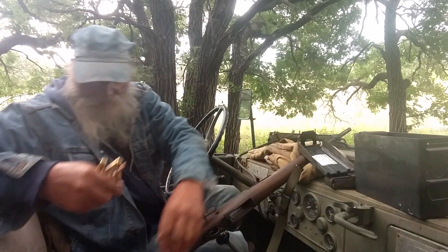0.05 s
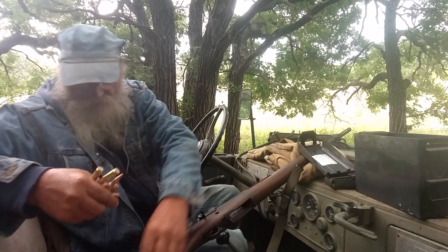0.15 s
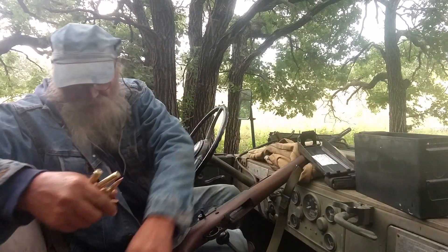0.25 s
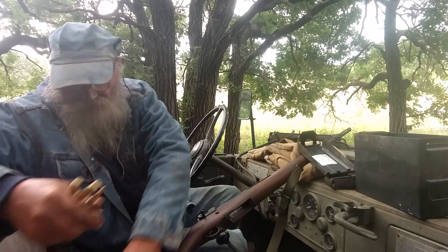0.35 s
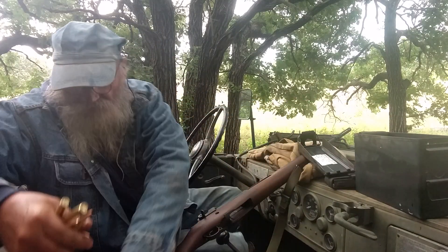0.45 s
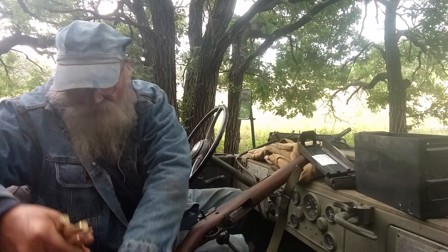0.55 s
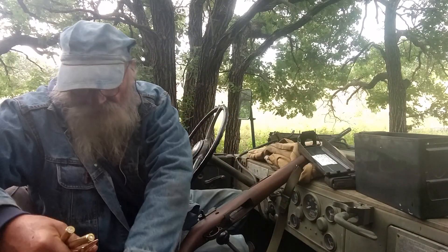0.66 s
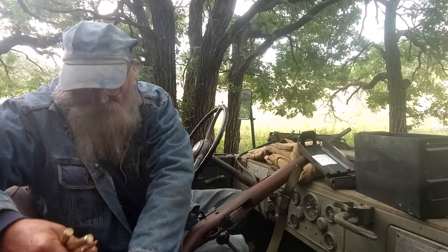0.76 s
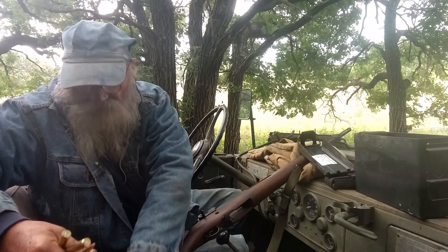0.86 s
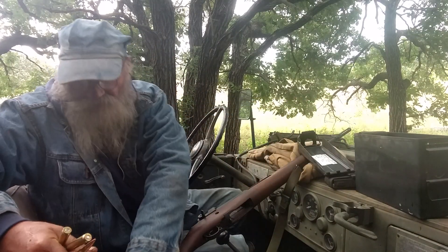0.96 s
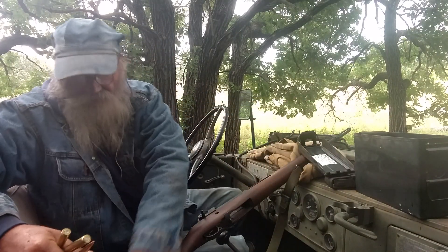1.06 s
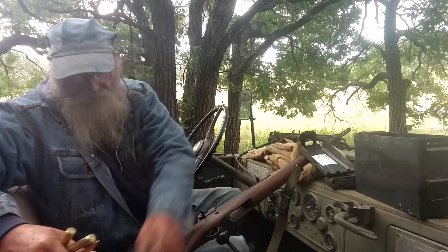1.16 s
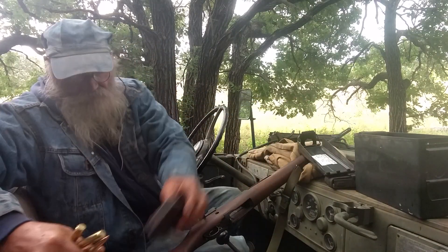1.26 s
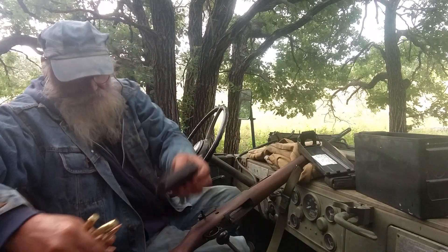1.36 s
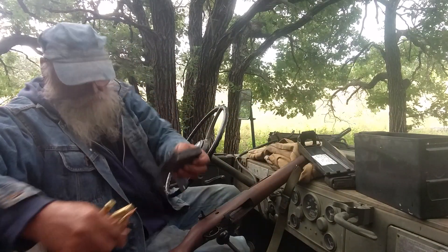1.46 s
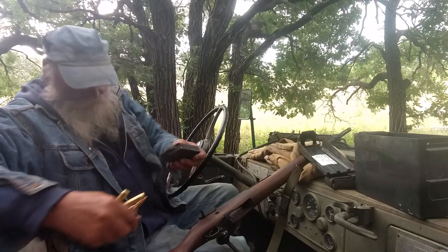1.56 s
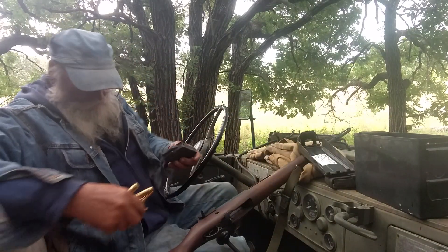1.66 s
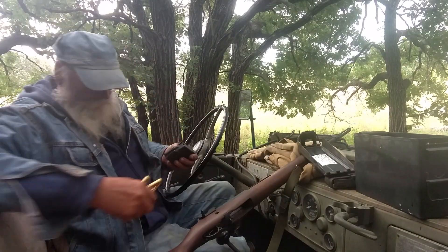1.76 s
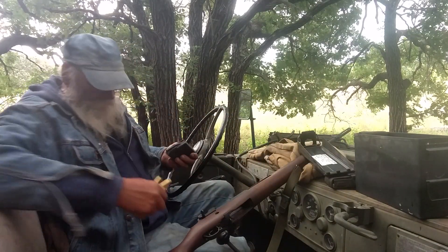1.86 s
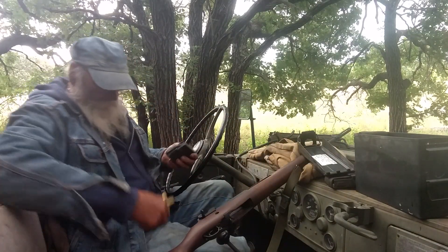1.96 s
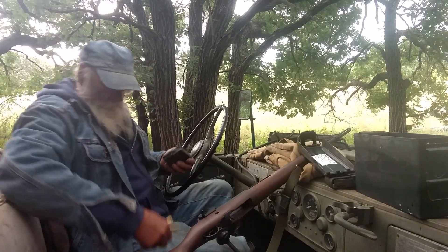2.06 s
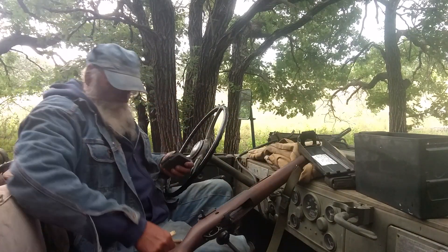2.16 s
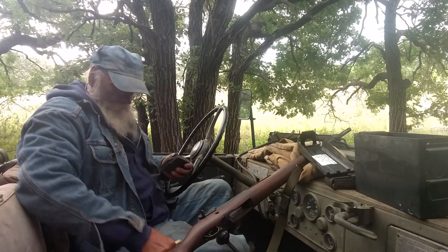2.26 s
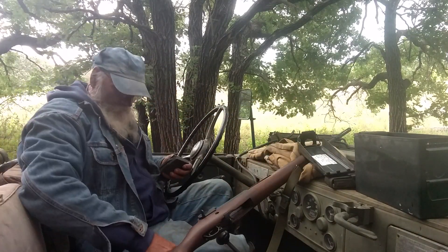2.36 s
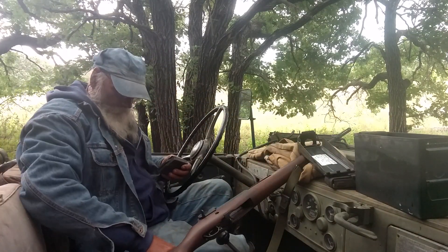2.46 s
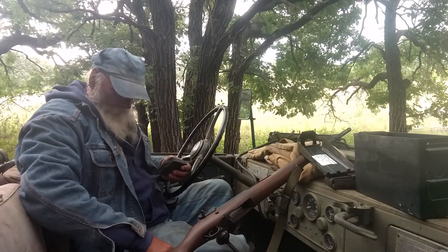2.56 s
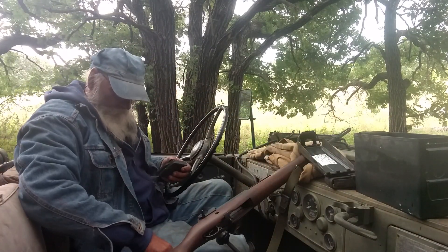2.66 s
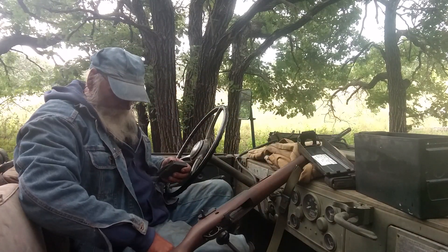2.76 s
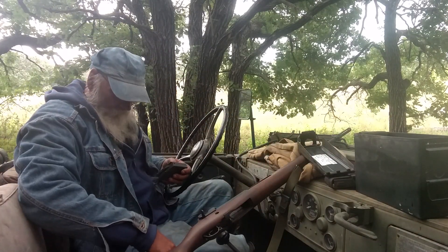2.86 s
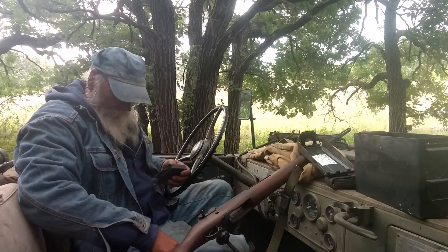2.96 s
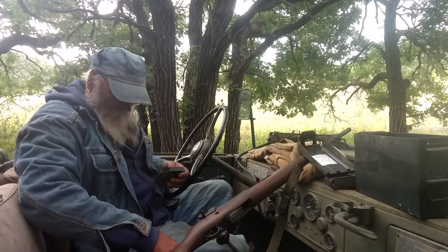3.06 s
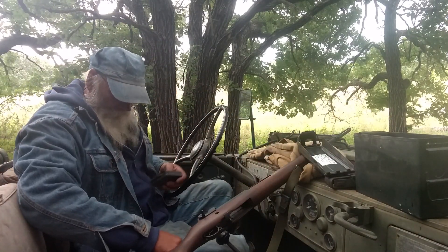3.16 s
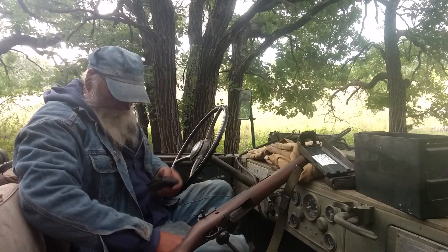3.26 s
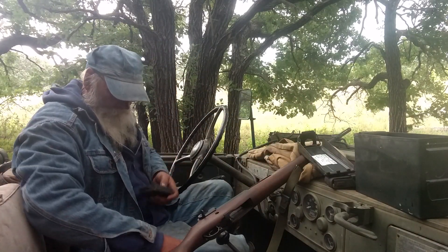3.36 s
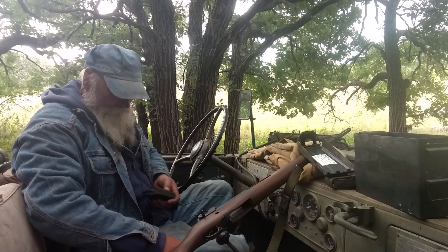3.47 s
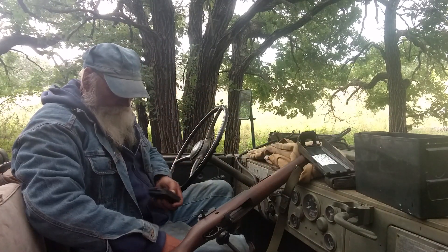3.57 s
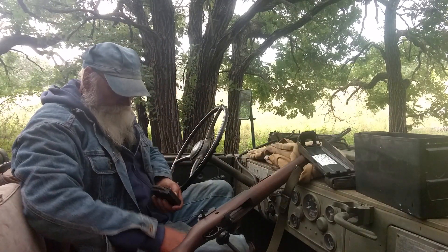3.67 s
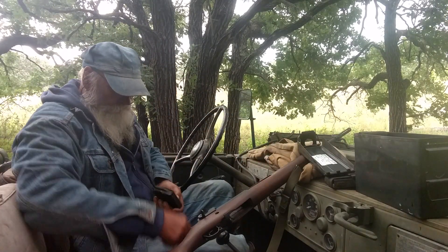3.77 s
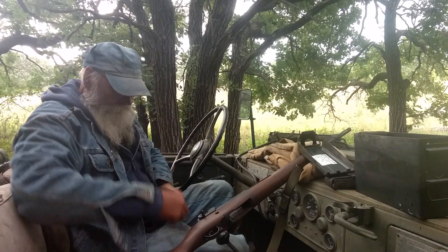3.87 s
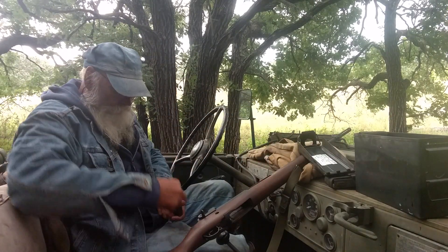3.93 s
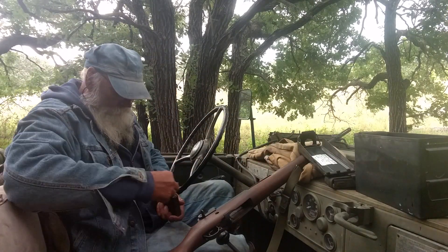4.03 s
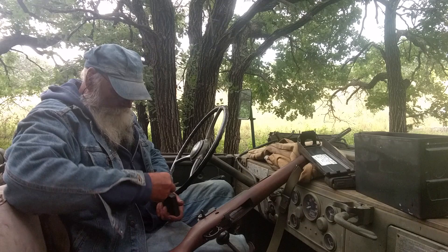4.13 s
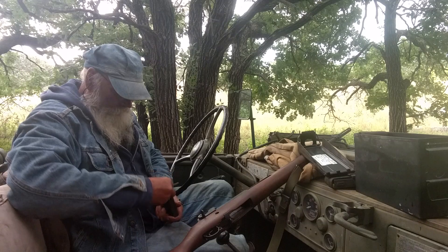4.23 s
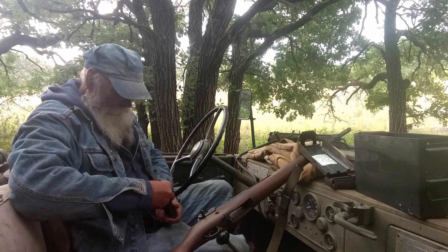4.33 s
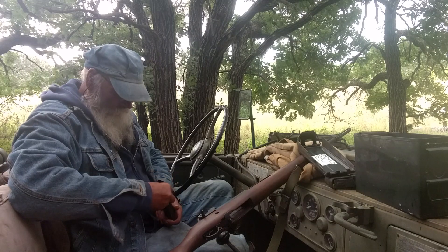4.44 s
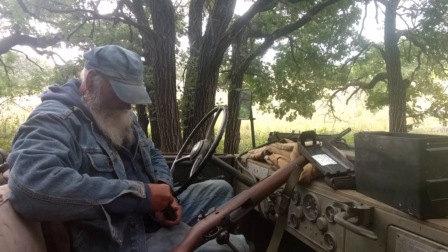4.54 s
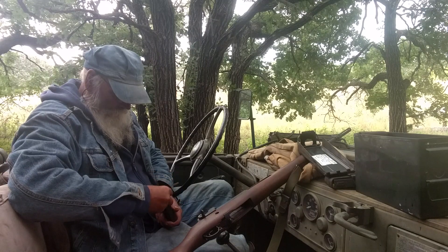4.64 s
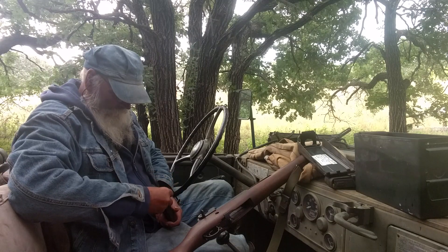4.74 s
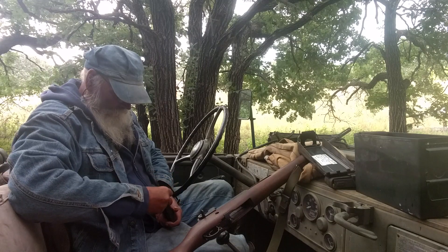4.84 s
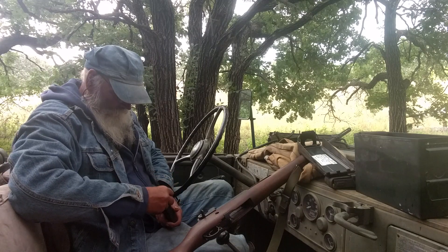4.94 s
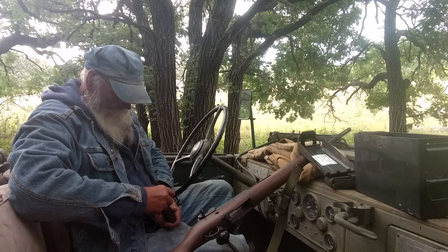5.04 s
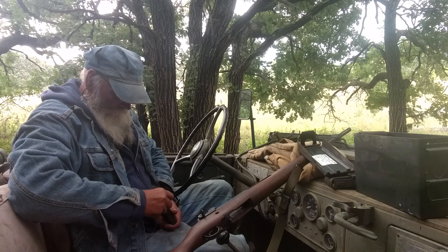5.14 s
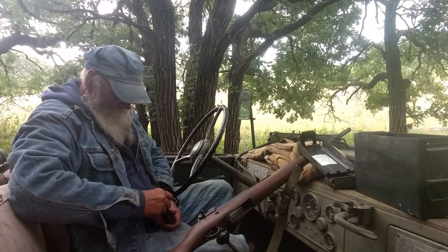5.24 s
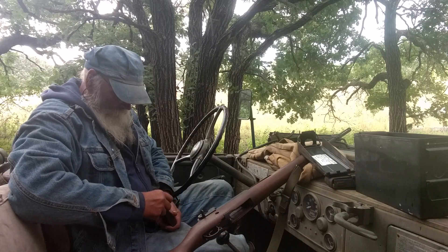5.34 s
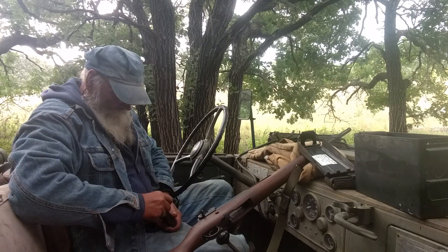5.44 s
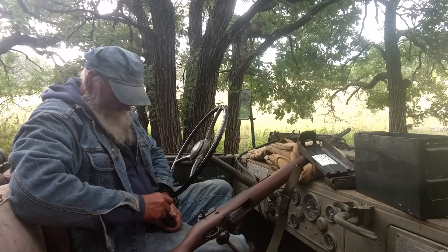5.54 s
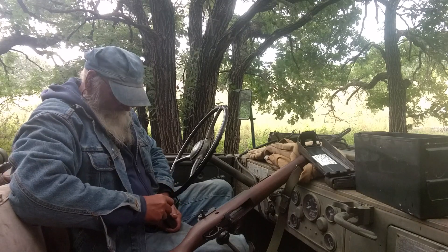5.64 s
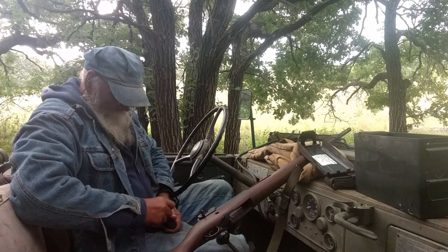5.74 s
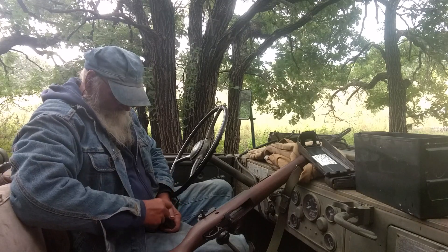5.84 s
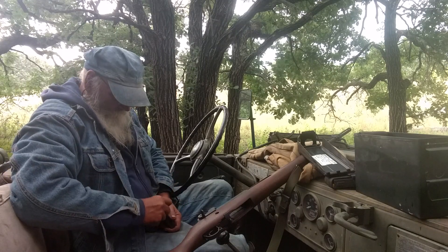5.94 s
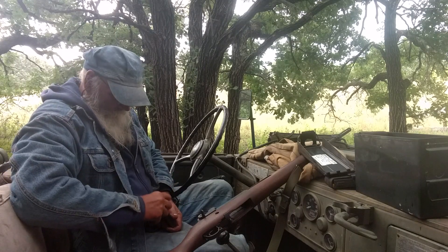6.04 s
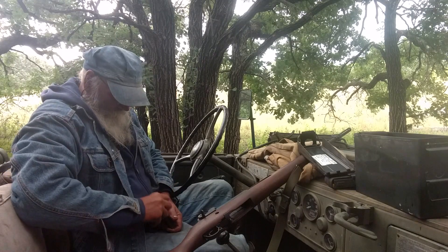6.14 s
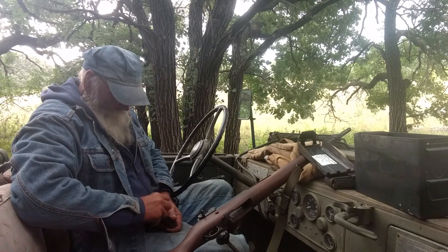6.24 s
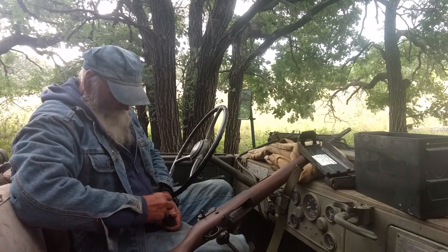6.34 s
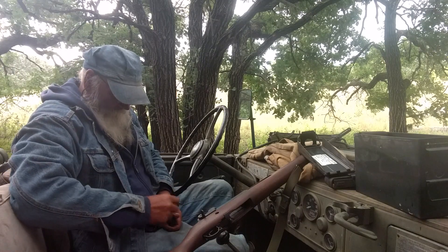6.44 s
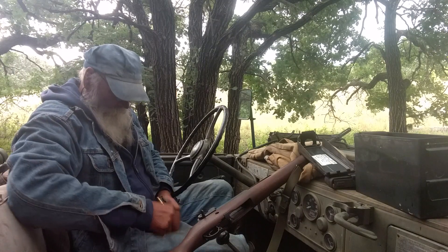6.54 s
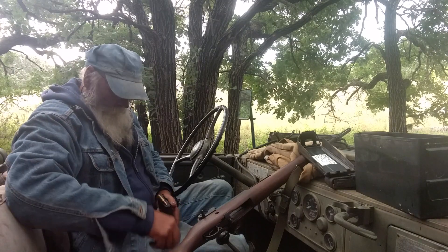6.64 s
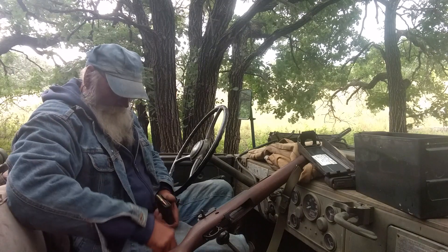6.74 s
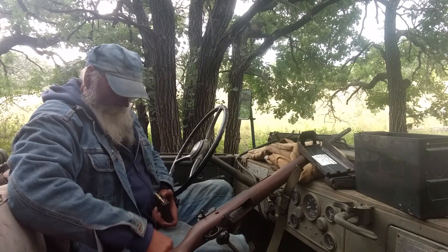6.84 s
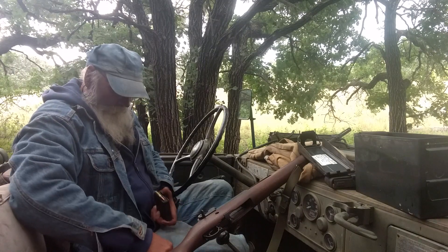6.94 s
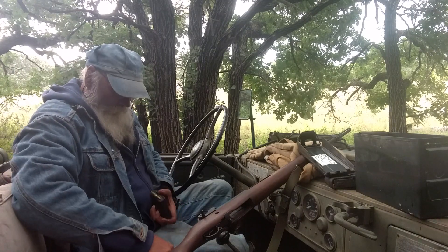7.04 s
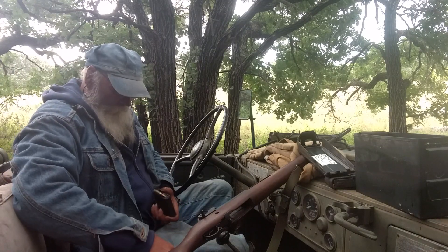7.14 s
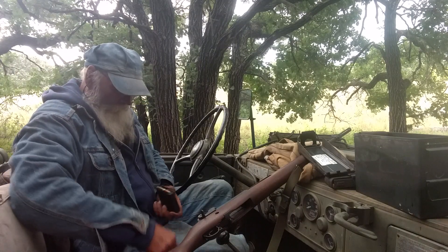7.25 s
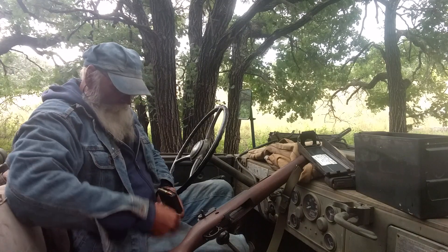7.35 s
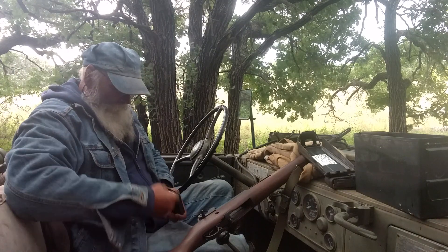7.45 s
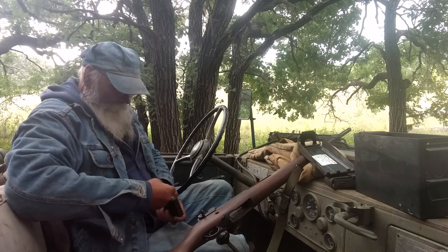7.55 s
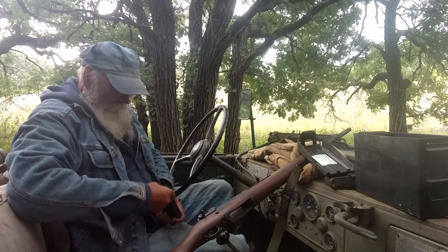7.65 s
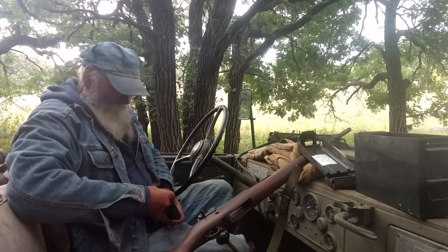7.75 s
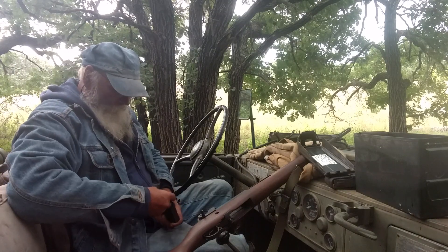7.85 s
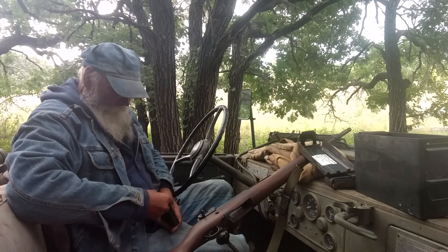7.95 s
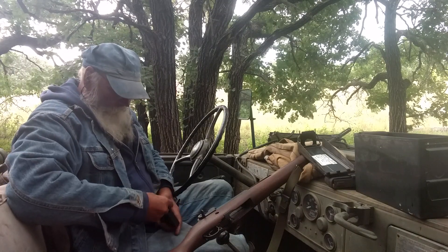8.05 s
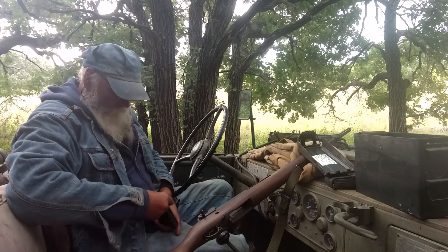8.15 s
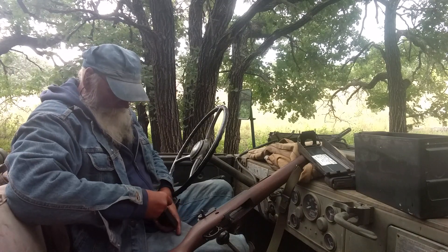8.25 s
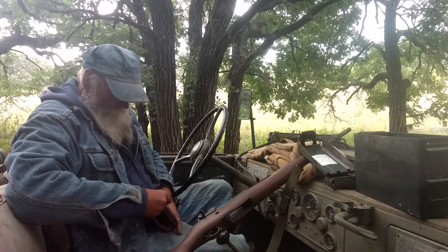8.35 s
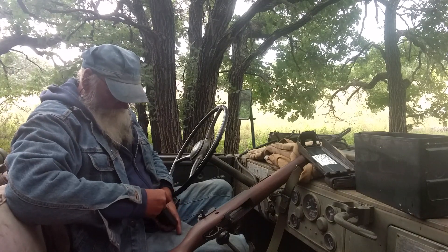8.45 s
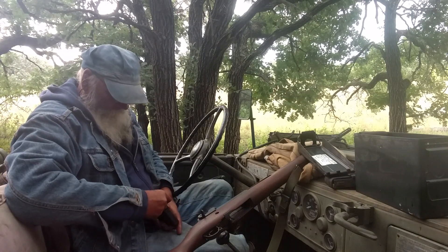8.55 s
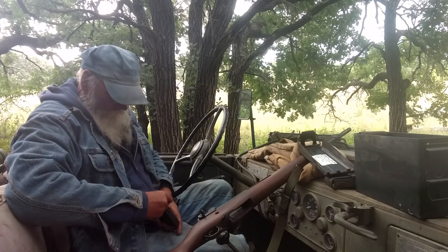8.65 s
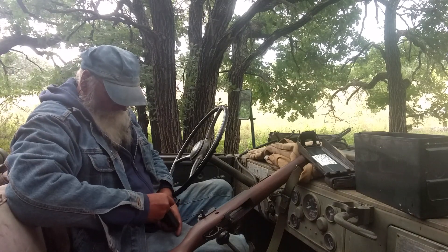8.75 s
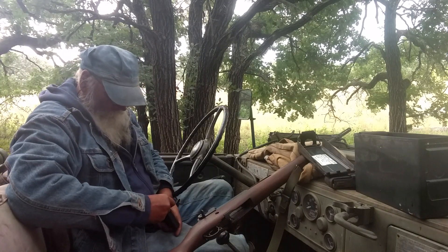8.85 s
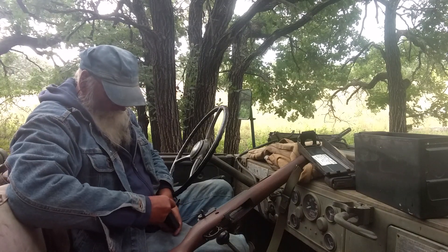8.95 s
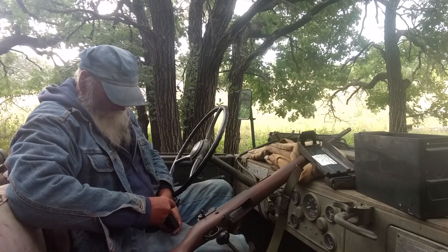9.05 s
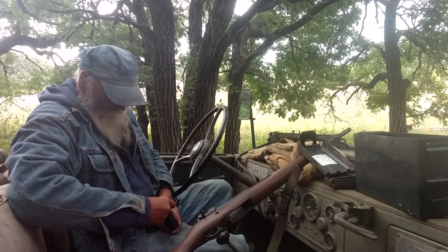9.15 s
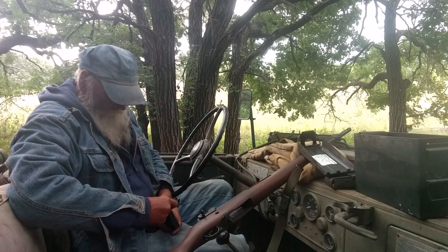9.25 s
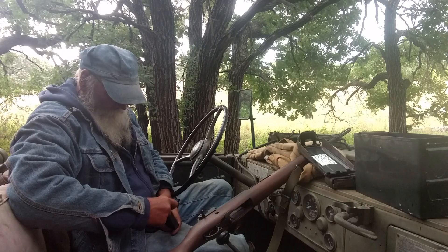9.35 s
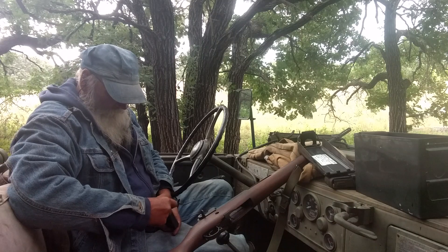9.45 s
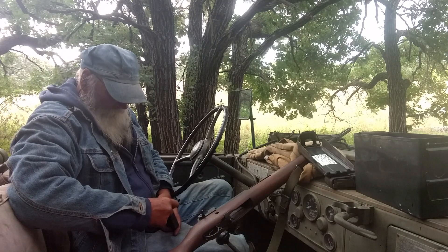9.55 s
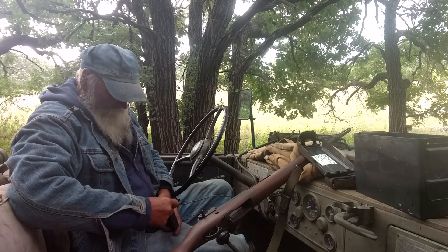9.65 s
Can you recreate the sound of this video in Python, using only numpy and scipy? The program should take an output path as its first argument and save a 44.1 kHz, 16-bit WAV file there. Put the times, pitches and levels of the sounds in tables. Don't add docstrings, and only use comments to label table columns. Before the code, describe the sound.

Outdoors, very close stereo pickup with little echo, slightly stronger on the right. Quiet leaf hiss and faint low wind run throughout, the hiss dipping after loud blows. Cloth rubs softly at 0.1 s; a bright steel clack rings at 0.5, followed by a hollow, dense clatter of a loose magazine from 0.7 to 1.0. Wind flutters around 1.5. Sleeve and seat cloth rustle from 1.6 to 2.3, with short low groans. Brass cartridges clink and jingle from 2.5 to 2.95. After a lull, sharp snaps come at 4.3, 4.45 and 4.75. Wind thuds on the right from 5.0 to 5.4. Hard metallic slams land at 5.7 and 6.12, the second loudest, with a small click at 6.26. Another double snap at 7.7 meets a wind bump, then lighter clicks at 8.5, 9.3 and 9.6, with faint cloth at 8.7.

```python
import sys
import numpy as np
from scipy import signal
from scipy.fft import rfft, irfft, next_fast_len
from scipy.io import wavfile
from scipy.ndimage import uniform_filter1d, map_coordinates

SR = 44100
rng = np.random.default_rng(int(sys.argv[2]) if len(sys.argv) > 2 else 0)


def file_out(sig):
    cols = np.atleast_2d(sig).T
    lim = np.clip(cols, -1, 1)
    pcm = np.round(lim * 32767).astype(np.int16)
    wavfile.write(sys.argv[1], SR, pcm)


def to_linear_factor(level_db):
    exponent = np.asarray(level_db, float) / 20
    return 10 ** exponent


N = 427769
T = np.arange(SR // 6) / SR
PORTS = np.array([[1], [0]])
HISS_TOP_HZ, TOP_HZ = 15400, 16600
LAG = 5


def unit(x):
    return x / np.sqrt(np.mean(x ** 2) + 1e-20)


def along(points, hz):
    f, v = np.transpose(points)
    return np.interp(np.log(hz + 1), np.log(f + 1), v)


def wobble(rate):
    knots = rng.standard_normal(int(N / SR * 60) + 4)
    return map_coordinates(knots, [np.arange(N) * min(rate, 60) / SR])


def filtered(x, response):
    n = x.shape[-1]
    m = next_fast_len(n + 4096)
    return irfft(rfft(x, m) * response(np.fft.rfftfreq(m, 1 / SR)), m)[..., :n]


def pair(x, alike):
    def shares(hz):
        turn = np.arccos(np.clip(along(alike, hz), -1, 1)) / 2
        return np.array([np.cos(turn), np.sin(turn)])
    mid, side = filtered(x, shares)
    return np.array([mid + side, mid - side])


def add(out, s, sound):
    out[:, round(s * SR):][:, :sound.shape[1]] += sound


def fade(t, rise, t60):
    t = np.maximum(t, 0)
    return (1 - np.exp(-t / max(rise, 1e-4))) ** 2 * to_linear_factor(-60 * t / max(t60, .003))


def swells(rows):
    t = np.arange(N) / SR
    return sum(to_linear_factor(db) * np.exp(-((t - s) / np.where(t < s, up, down)) ** 2) for s, db, up, down in rows)


def lumps(rows):
    lead = SR // 5
    out, t = np.zeros((2, N + SR)), np.arange(-lead, lead) / SR
    for (s, db, hz, half, left_db), turn in zip(rows, rng.random(len(rows))):
        lump = np.exp(-(t / half) ** 2) * np.cos(2 * np.pi * (hz * t + turn))
        add(out, s, to_linear_factor(db + left_db * PORTS) * lump)
    return out[:, lead:][:, :N]


# (time [s], peak level [dB], pitch [Hz], length [s])
LOOSE_KNOCKS = [(.478, -35.5, 840, 0.016), (.509, -29, 1110, 0.0088), (.701, -14, 760, 0.0043),
                (.721, -16.5, 1104, 0.006), (.771, -22, 1130, 0.0025), (.787, -33, 704, 0.0026),
                (.81, -38, 807, 0.004), (.849, -34, 834, 0.006), (.889, -15.5, 1470, 0.0081),
                (.894, -20, 1100, 0.0032), (.916, -33, 750, 0.0046), (.927, -36, 1000, .003),
                (.935, -30, 1190, .004), (.946, -33, 900, .004), (.970, -16, 800, 0.0045),
                (.978, -16, 1290, 0.0052), (.985, -24, 870, 0.0025), (.991, -29, 794, 0.0046),
                (1.002, -28, 790, 0.0069), (1.028, -30.5, 970, 0.0053)]
# (time [s], peak level [dB], pitch [Hz], length [s])
SNAPS = [(4.289, -16.5, 790, 0.0056), (4.404, -34, 825, 0.012), (4.461, -36, 900, 0.0043),
         (4.445, -23.5, 840, 0.0033), (4.528, -22.5, 957, 0.0044), (4.735, -27, 790, 0.0072),
         (4.753, -27.5, 950, 0.004), (4.768, -38, 795, 0.011), (5.7027, -11.5, 750, 0.0041),
         (6.1023, -26, 740, .004), (7.659, -22.5, 700, 0.006), (7.725, -21, 790, 0.0041),
         (8.518, -20.5, 730, 0.0035), (9.147, -35, 970, 0.0072), (9.338, -26.5, 925, 0.0027)]
# (time [s], peak level [dB], pitch [Hz], length [s])
PUSHES = [(4.83, -41, 850, 0.0074), (5.132, -33, 684, 0.0048), (5.686, -33, 684, 0.0055),
          (5.6925, -13, 673, 0.0052), (5.7055, -13, 622, 0.0049), (6.119, -34, 815, 0.0037),
          (5.762, -37.5, 732, 0.0041), (5.915, -39.5, 604, 0.0041), (6.1235, -8.5, 1040, 0.0036),
          (6.1259, -8.5, 685, 0.0038), (6.263, -21.5, 676, 0.0046), (8.704, -38, 630, 0.0089),
          (9.138, -35, 870, 0.005), (9.299, -36.5, 590, 0.008), (9.606, -32.5, 560, 0.0029)]


def knocks():
    # (knocks, rise over length, roughness at 0 dB, its growth per dB softer)
    grips = [(LOOSE_KNOCKS, 0.18, 0.76, 0.0012), (SNAPS, 0.18, 0.049, 0.0069), (PUSHES, 0.45, 0.043, 0.011)]
    rows = sorted((s, db, hz, share * length, length, rough - grows * db)
                  for table, share, rough, grows in grips for s, db, hz, length in table)
    out, t = np.zeros((2, N + SR)), T - 7.0 * PORTS / SR
    for s, db, hz, rise, length, rough in rows:
        rough = np.clip(rough, 0, 1)
        shared, own = rng.standard_normal((2, len(T)))
        sos = signal.butter(2, [hz / (1.25 + 5 * rough ** 2), hz * 1.5], "band", fs=SR, output="sos")
        noise = unit(signal.sosfilt(sos, [np.roll(shared, LAG) + 0.59 * own, shared]))
        body = (1 - rough) * np.sin(2 * np.pi * hz * t) + 0.25 * rough * noise
        choke = np.exp(-abs(t / length) ** (2.8 - 3 * rough).clip(1, 3))
        body = body * (fade(t, rise, 0.74) * choke + 0.058 * fade(t, rise, 9 * length))
        add(out, s, to_linear_factor(db - 2.0 - 2.2 * PORTS) * body / abs(body).max())
    return out[:, :N]


# (time [s], peak level [dB], low share [dB], top share [dB])
DIG = [(.5091, -15.5, -17, 1), (.638, -51, -8, 7), (.7012, -21.5, -17, -5), (.723, -20, -17, -9),
       (.7718, -16, -6, -12), (.848, -33, -20, -22), (.8896, -22, 0.5, -7), (.9354, -42, 0, -1),
       (.9782, -9.5, -10.5, -10), (1.0281, -28, -7, -26)]
# (time [s], peak level [dB], low share [dB], top share [dB])
LAP = [(1.6262, -36, -7, -18), (2.155, -27, -16, -12), (2.5103, -31, -30, 1), (2.6264, -35, -11, -1),
       (2.6918, -34, -26, 13.5), (2.705, -30, -14, -10), (2.813, -25.5, -21, -6), (2.8464, -28, -11, -3),
       (2.8794, -32, -15, -4), (2.9226, -27.5, -12, -4), (2.9418, -26.5, -13, 0)]
# (time [s], peak level [dB], low share [dB], top share [dB])
LIPS = [(4.2877, -18, -8.5, -5.5), (4.4453, -18.5, -11, -10), (4.5267, -33.5, -0.5, -20),
        (4.7354, -27, -7.5, -7), (4.7544, -29.5, -2, -16), (4.8326, -44, 6, -20), (5.779, -45, -12, 7),
        (6.103, -27.5, -8, -12), (6.2652, -38, -4, -18), (7.7255, -27, -0.5, 2), (8.5165, -32.5, -4, -31.5),
        (9.3374, -47, 9, -15)]
# (time [s], peak level [dB], low share [dB], top share [dB])
SEATED = [
    (5.7027, -16, -11.5, -5),
    (6.125, -14.5, -15, -9),
    (7.659, -18, -13, -6.5),
]


def cracks():
    # (contacts, t60 [s], top edge [Hz], left port [dB], size of the first instant over the rest)
    places = [(DIG, 0.023, 10900, -3, 0.85), (LAP, 0.02, 13500, -1.2, 1),
              (LIPS, 0.035, 11700, -2, 0.39), (SEATED, 0.032, 12000, -1.1, 0.24)]
    out = np.zeros((2, N + SR))
    t = T - LAG * PORTS / SR
    rows = [(*row, *place) for table, *place in places for row in table]
    for s, db, low_db, top_db, t60, edge_hz, left_db, spike in rows:
        first_instant = 1 + spike * to_linear_factor(-60 * T / (0.27 * t60))
        # (band [Hz], share [dB], life over t60)
        bands = [((1000, 1930), low_db, 1.3), ((2300, 5860), 0, 1), ((6000, edge_hz), top_db, .75)]
        for band, share_db, life in bands:
            shared, left, right = rng.standard_normal((3, len(T)))
            noise = np.array([np.roll(shared, LAG) + 1.2 * left, shared + 1.2 * right])
            sos = signal.butter(3, band, "band", fs=SR, output="sos")
            crack = signal.sosfilt(sos, noise * fade(t, 0.00016, t60 * life) * first_instant)
            add(out, s, to_linear_factor(db + share_db - 0.5 + left_db * PORTS) * crack / abs(crack).max())
    return out[:, :N]


# (time [s], right level [dB], pitch [Hz], left over right [dB])
LOOSE_RINGS = [(.509, -8.5, 2830, -14), (.509, -20, 8780, 4), (.509, -18, 6970, 4), (.701, -28, 5990, 3),
               (.703, -34, 3230, 8), (.723, -27, 3100, 7), (.772, -32, 6400, -4), (.89, -29, 3160, 10),
               (.89, -10.5, 2560, 0), (.509, -34, 15000, -6), (.979, -33, 14000, 2), (.979, -27, 2300, -12),
               (.979, -33, 3800, -3), (.979, -19, 7000, -8), (.89, -33.5, 6400, -2), (.979, -19, 1480, 1),
               (.509, -24, 5400, 15.5), (.702, -25, 1380, 5)]
# (time [s], right level [dB], pitch [Hz],
# left over right [dB])
HELD_RINGS = [(2.510, -43, 6360, 9), (2.692, -36, 12300, -5), (2.848, -45, 11200, 2),
              (2.879, -49, 11200, -2), (2.942, -45, 10800, 6), (4.289, -33, 6230, 3),
              (4.289, -27, 4800, -7), (4.289, -25, 1636, -12), (4.446, -26.5, 1630, -7),
              (4.446, -36, 6570, 3.5), (4.618, -37, 3400, -12), (4.735, -33, 2550, 16),
              (4.736, -30.5, 4050, -8), (4.736, -29, 1550, -6), (5.703, -31, 7660, 8),
              (5.703, -35, 5130, -8), (5.703, -35, 2030, 9), (6.125, -34, 5800, -17),
              (6.125, -38, 3700, -6), (6.125, -36, 8150, 6), (7.659, -32, 5440, 7.5),
              (7.659, -30, 3530, -12), (7.727, -28.5, 2380, 6), (7.726, -32, 3250, 3)]
# (time [s], right level [dB], pitch [Hz], left over right [dB])
LIP_RINGS = [(.511, -30, 560, -2), (.772, -26.5, 3360, -2), (.772, -30, 4300, -2), (.89, -28, 2000, 3),
             (.979, -27, 4430, 0), (2.922, -32, 4870, 0), (2.942, -35, 4900, 2), (4.288, -40, 14100, 0),
             (4.446, -33, 8550, 1), (4.736, -39, 8600, -1), (4.755, -28, 2390, -6), (5.703, -31, 14200, 0),
             (5.704, -30, 6740, -2), (5.704, -31, 5800, 0), (6.125, -33, 14200, 0), (6.126, -26, 6560, -2),
             (6.125, -29, 10000, -4), (7.659, -39, 14300, -2)]
# (time [s], right level [dB], left over right [dB])
JINGLE = [(2.51, -39, 9), (2.53, -48, 0), (2.678, -30, 1), (2.691, -27, -7), (2.705, -29, -5),
          (2.722, -35, -6), (2.74, -44, -4), (2.814, -43, -5), (2.849, -36, 0), (2.862, -41, 3),
          (2.878, -46, 5), (2.922, -31, -6), (2.942, -40, 2)]
# (pitch [Hz], level [dB], t60 [s])
BRASS_MODES = [(5680, -2, 0.048), (6060, -15, .012), (11200, -24, .015)]


def rings():
    # (rings, t60 [s], samples late at the left port)
    panels = [(LOOSE_RINGS, 0.0094, 2.1), (HELD_RINGS, 0.037, 4.2), (LIP_RINGS, 0.013, 0.66)]
    steel_split, steel_twin = .028, 1.06
    brass_split, brass_twin, brass_lag = .006, .4, 7.6
    rows = [(*row, t60, lag, steel_split, steel_twin) for table, t60, lag in panels for row in table]
    for s, db, left_db in JINGLE:
        pitch = 1 + .003 * rng.standard_normal()
        rows += [(s, db + mode_db, hz * pitch, left_db, t60, brass_lag, brass_split, brass_twin)
                 for hz, mode_db, t60 in BRASS_MODES]
    out = np.zeros((2, N + SR))
    for s, db, hz, left_db, t60, lag, split, twin_size in rows:
        twin_hz = hz * (1 + split * (.5 + rng.random()))
        twin = twin_size * np.sin(2 * np.pi * (twin_hz * T + rng.random((2, 1))))
        mode = np.sin(2 * np.pi * hz * (T - lag * PORTS / SR))
        add(out, s, to_linear_factor(db - 0.5 + left_db * PORTS) * fade(T, 0.00035, t60) * (mode + twin))
    return out[:, :N]


# (time of peak [s], level [dB], swell [s], fall [s])
DRAG = [(.75, -47, 0.054, 0.1), (.915, -45, 0.0078, 0.025), (.94, -39, 0.015, 0.016),
        (1.002, -41, 0.033, 0.013), (9.15, -46, .02, 0.054), (1.035, -53, 0.0071, 0.013)]
# (time of peak [s], level [dB], swell [s], fall [s])
SEAT = [(.12, -42.5, 0.049, 0.051), (.22, -49, 0.064, 0.062), (1.71, -39.5, 0.15, 0.41),
        (1.982, -40, 0.024, 0.023), (2.15, -39, 0.13, 0.066), (2.225, -40.5, 0.031, 0.05)]
# (time of peak [s], level [dB], swell [s], fall [s])
SLEEVE = [(0.15, -53, 0.027, .02), (0.157, -47, .008, 0.077), (1.685, -42.5, 0.11, .04),
          (1.716, -35.5, 0.036, 0.32), (1.87, -48, 0.088, 0.12), (0.47, -44.5, .03, .02),
          (8.7, -45, 0.07, 0.052)]


def rub():
    def band(hz, width, clump_db):
        grains = pair(rng.standard_normal((2, N)), [(300, 1.0), (1500, 0.043)])
        clumps = to_linear_factor(clump_db * wobble(45)) * grains
        return unit(filtered(clumps, lambda f: 1j * f * hz / (hz * hz - f * f + 1j * width * f * hz)))
    seat, sleeve = band(347, 0.32, 2.2), band(830, 0.34, 1.6)
    fizz, well = band(2580, 0.26, 3.2), band(520, 1.0, 4.8)
    well = filtered(well, lambda hz: 1 / (1 + 1j * hz / 3500))
    out = swells(DRAG) * well
    out = out + to_linear_factor(-5.0) * swells(SEAT) * seat
    out = out + to_linear_factor(-9.0) * swells(SLEEVE) * (sleeve + to_linear_factor(-3.5) * fizz)
    return filtered(out, lambda hz: hz < HISS_TOP_HZ) * to_linear_factor([[-2.5], [2.5]])


# (time [s], peak level [dB], pitch [Hz], half length [s], left port [dB])
GROANS = [(0.12, -35, 480, 0.0063, -12), (.282, -40, 132, .042, -6), (0.713, -30, 265, 0.0029, -2),
          (0.981, -40, 220, 0.0021, 4), (1.737, -25.5, 242, 0.0048, -6), (1.759, -39, 952, 0.033, -14),
          (1.797, -37, 954, 0.012, -13), (2.114, -36, 425, 0.012, -7), (2.147, -34, 430, 0.022, -11),
          (2.72, -31.5, 192, 0.0069, -2), (8.84, -44, 202, 0.083, 2), (8.96, -44, 199, .062, 0)]


def groans():
    return lumps(GROANS)


# (frequency [Hz], level [dB per Hz])
SCATTER = [(250, -52), (550, 13), (900, 24.5), (2000, 5), (6000, 12), (10000, -28), (15000, -36)]
# (frequency [Hz], likeness [-1 to 1])
ALIKE = [(40, -0.31), (200, 0.78), (500, 0.69), (1200, 0.076), (1800, -0.51), (2550, -0.088), (3300, 0.21),
         (6000, -0.046)]


def scatter(x):
    tail = rng.standard_normal((2, len(T))) * fade(T - .002, 0.00035, 0.073)
    tail = filtered(pair(tail, ALIKE), lambda hz: to_linear_factor(along(SCATTER, hz)))
    return signal.fftconvolve(x, tail / np.linalg.norm(tail[0]), axes=1)[:, :N]


# (time [s], peak level [dB])
EDDIES = [(1.416, -32), (1.477, -31), (1.51, -30), (1.543, -34), (4.993, -26), (5.05, -33), (5.132, -46),
          (5.169, -35), (5.201, -31), (5.253, -23), (5.279, -33), (5.293, -31), (5.342, -34), (5.37, -26),
          (5.412, -22), (7.095, -38), (7.71, -30), (7.745, -36), (7.771, -22), (8.08, -33), (8.109, -32)]


def eddies():
    return lumps([(s, db, 97 * (1 + 0.067 * rng.standard_normal()), 0.0049, -39) for s, db in EDDIES])


# (time [s], depth [dB])
DUCKS = [(-.2, 5), (.5, 5), (.98, 4.5), (4.9, 1.5), (5.7, 4.5), (6.13, 6.5)]


def riding_db():
    sink_s, hold_s, recover_db_per_s = 0.02, 0.22, 9.5
    t = np.arange(N) / SR
    down = []
    for s, db in DUCKS:
        left = (db - recover_db_per_s * (t - s - hold_s).clip(0)).clip(0)
        down.append((1 - np.exp(-(t - s).clip(0) / sink_s)) * left)
    return -uniform_filter1d(np.max(down, 0), size=2000)


# (frequency [Hz], level [dB per Hz])
THUD = [(15, -34), (50, -6), (95, 3), (150, -7.5), (250, -28), (500, -66)]
# (time of peak [s], level [dB], swell [s], fall [s])
GUSTS = [(.95, -47, .2, .15), (1.5, -42, 0.094, 0.36), (3.15, -43, 0.3, 0.14), (3.95, -50, 0.15, 0.11),
         (5.25, -30.5, 0.22, 0.19), (6.0, -49, 0.093, 0.11), (7.1, -46, 0.33, 0.2),
         (7.75, -39, 0.14, 0.081), (8.25, -47, 0.2, 0.12), (9.25, -52, .2, .2)]


def wind(gain_db):
    noise = to_linear_factor(3.9 * np.array([wobble(22), wobble(22)])) * rng.standard_normal((2, N))
    rumble = unit(filtered(noise, lambda hz: to_linear_factor(along(THUD, hz)))) * to_linear_factor([[-3], [1.5]])
    calm_db = -51
    return to_linear_factor(-11.0) * (to_linear_factor(calm_db + gain_db) + swells(GUSTS)) * rumble


# (frequency [Hz], level [dB per Hz])
LEAVES = [(20, -16), (60, -8), (150, 4), (350, 0.5), (650, -3.5), (1100, -8), (2000, -9.5), (4000, -10.5),
          (7000, -14.5), (10000, -21.5), (13000, -28), (15500, -36)]


def leaves(gain_db):
    z = signal.stft(rng.standard_normal((2, N)), nperseg=512)[2]
    patches = uniform_filter1d(rng.standard_normal(z.shape[1:]), size=6, axis=0)
    patches = unit(uniform_filter1d(patches, size=12, axis=1))
    noise = signal.istft(z * to_linear_factor(1.02 * patches), nperseg=512)[1][:, :N]
    hiss = filtered(pair(noise, ALIKE), lambda hz: to_linear_factor(along(LEAVES, hz)) * (hz < HISS_TOP_HZ))
    return to_linear_factor(-43.5 + gain_db + 0.15 * wobble(23)) * unit(hiss) * to_linear_factor(-.6 * PORTS)


def scene():
    knock, click = knocks(), cracks() + rings()
    hands = knock + click + scatter(to_linear_factor(-30.5) * knock + to_linear_factor(-18.5) * click)
    gain_db = riding_db()
    return hands + rub() + groans() + eddies() + wind(gain_db) + leaves(gain_db)


def top_cut(x):
    return signal.sosfilt(signal.butter(12, 16640, fs=SR, output="sos"), x)


# (frequency [Hz], cross-feed gain)
FEED = [(100, .72), (1300, .79), (2600, .83), (5200, .68), (8000, .6), (12000, .55)]


def record(dry):
    wide = dry - filtered(dry[::-1], lambda hz: along(FEED, hz) * np.exp(-2j * np.pi * hz * 17 / SR))
    mix = filtered(wide, lambda hz: np.where(hz < HISS_TOP_HZ, 1, to_linear_factor(-22)) * (hz < TOP_HZ))
    return top_cut(mix)


dry = scene()
out = record(dry)
file_out(out)
```